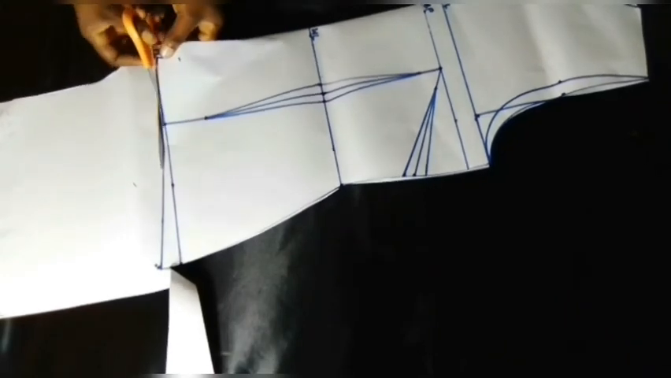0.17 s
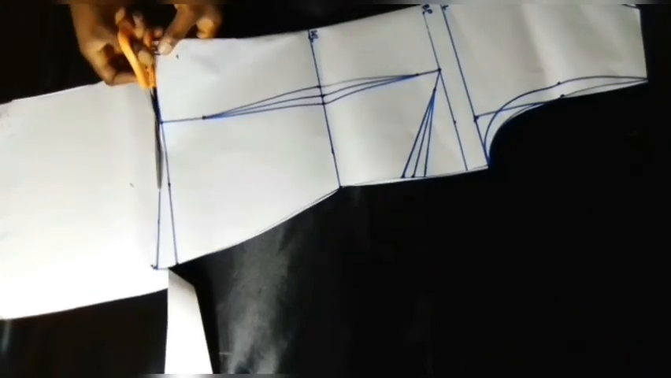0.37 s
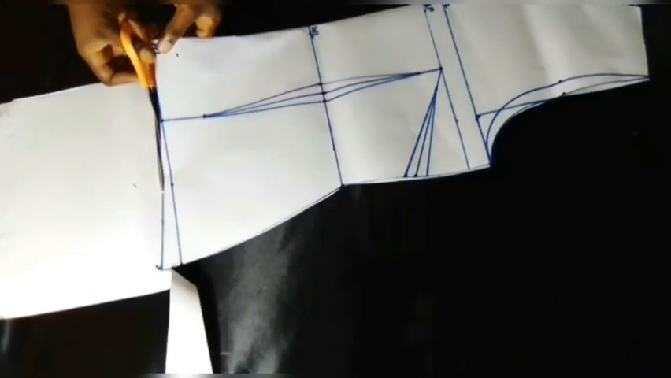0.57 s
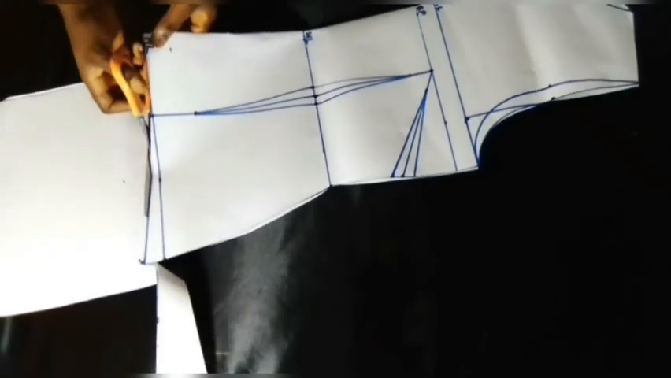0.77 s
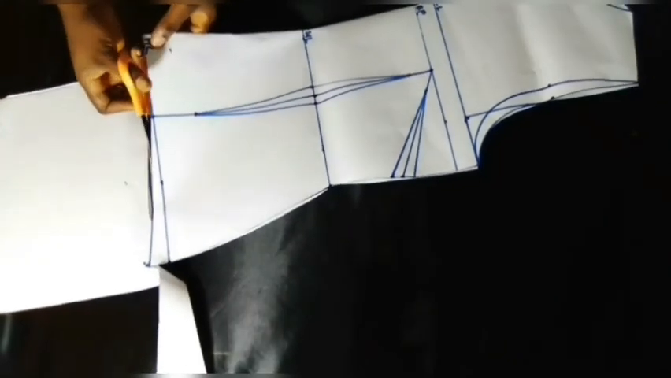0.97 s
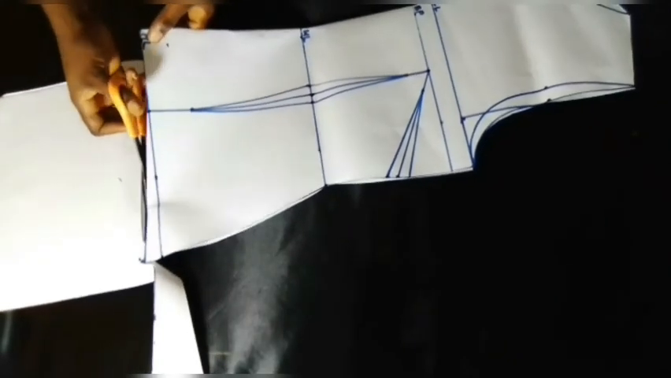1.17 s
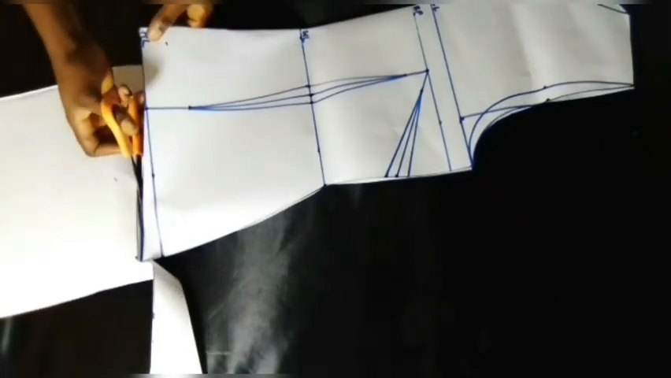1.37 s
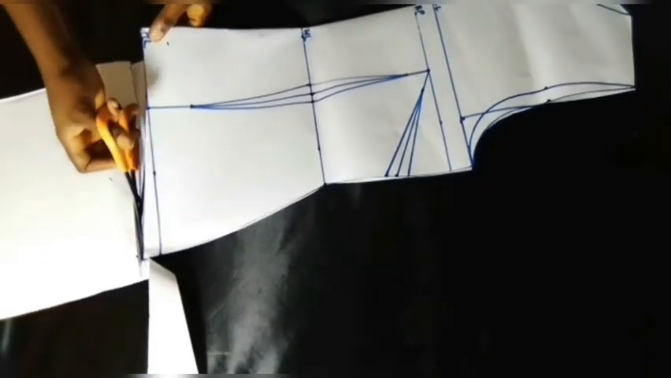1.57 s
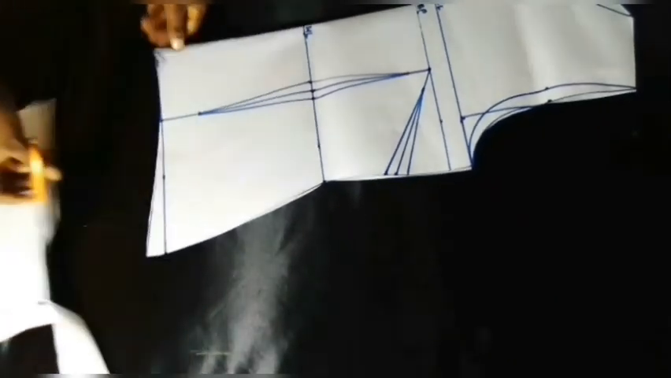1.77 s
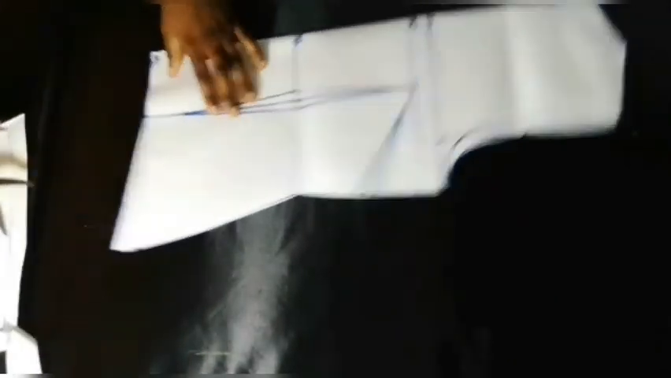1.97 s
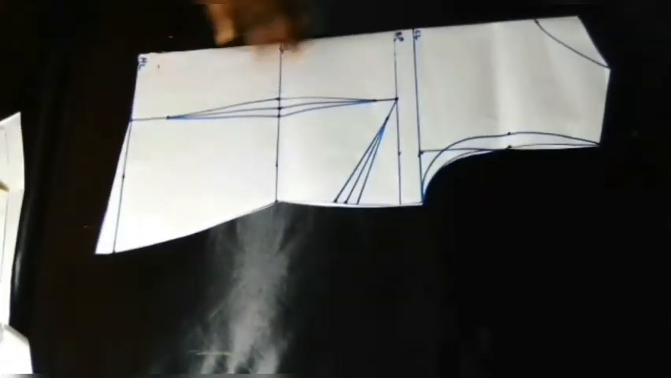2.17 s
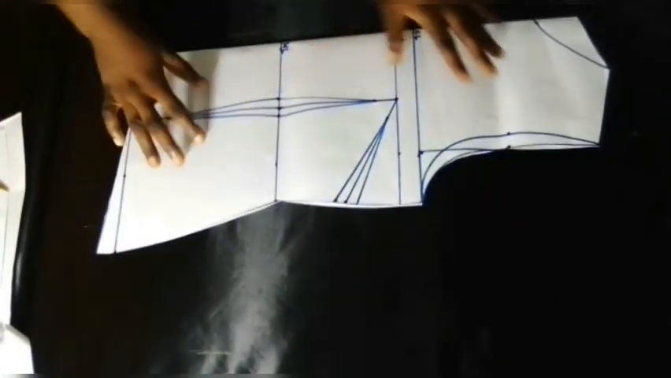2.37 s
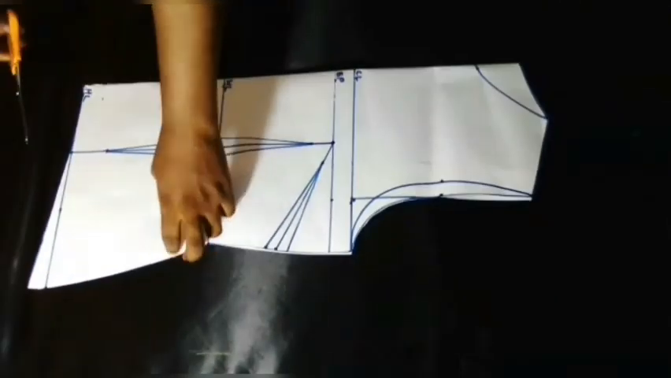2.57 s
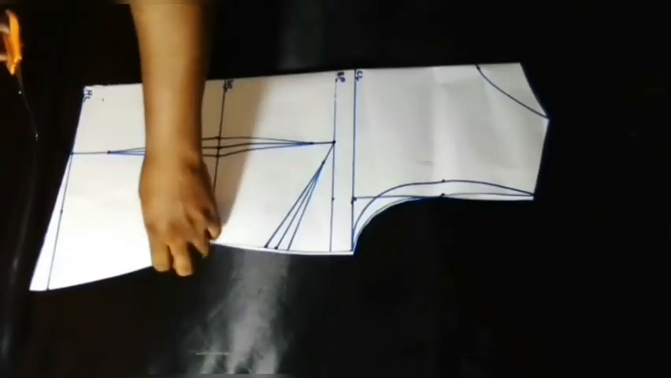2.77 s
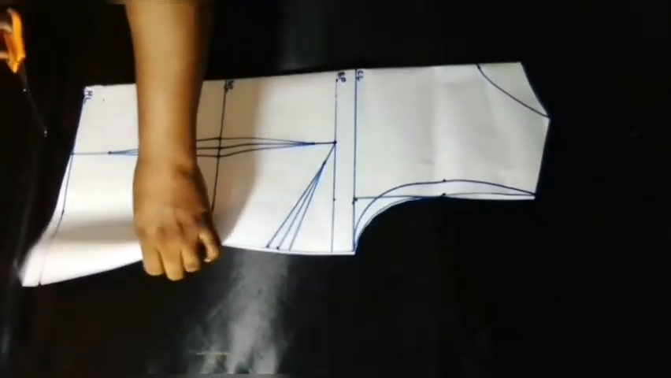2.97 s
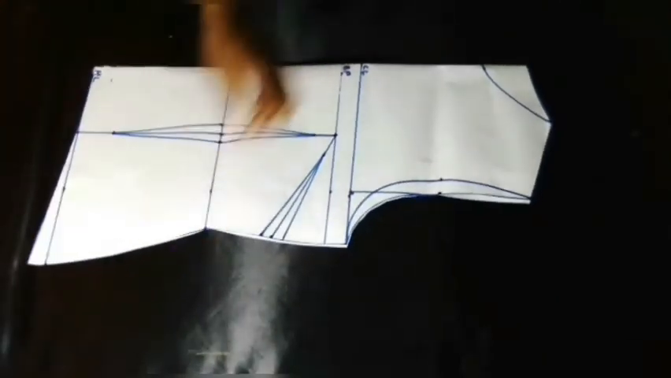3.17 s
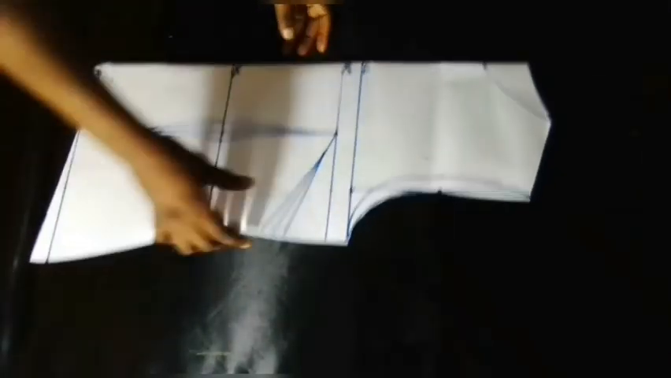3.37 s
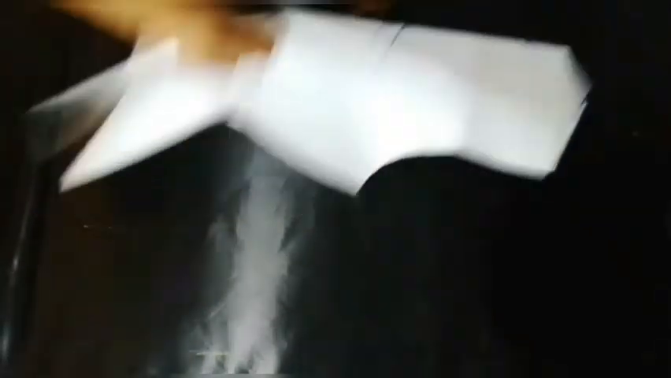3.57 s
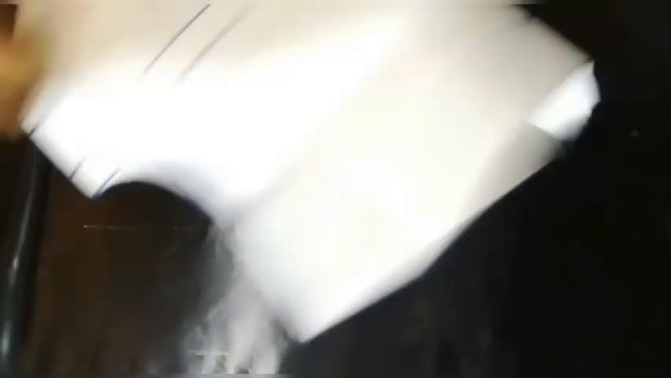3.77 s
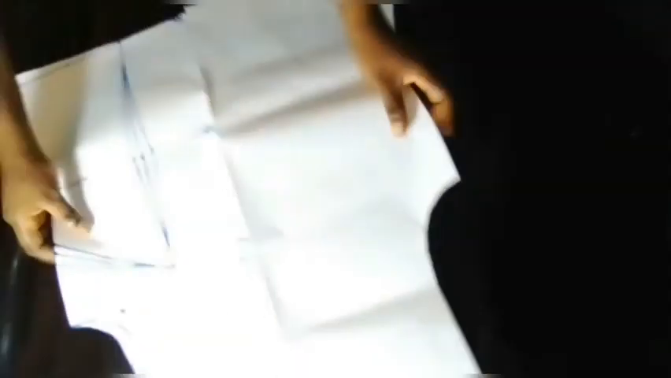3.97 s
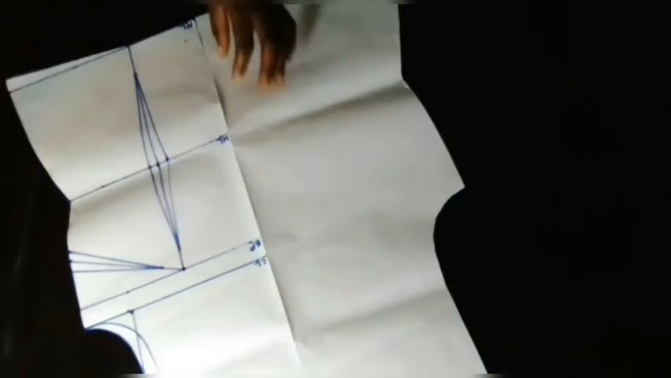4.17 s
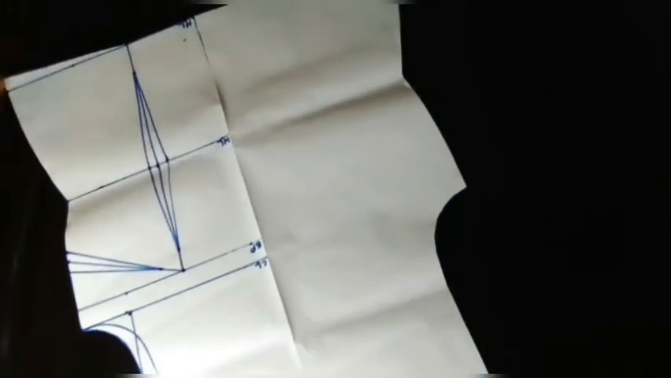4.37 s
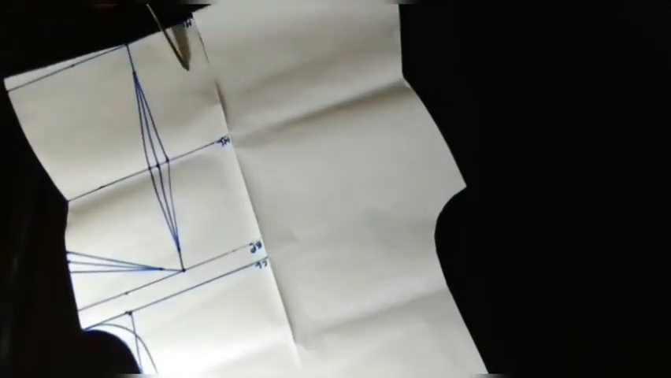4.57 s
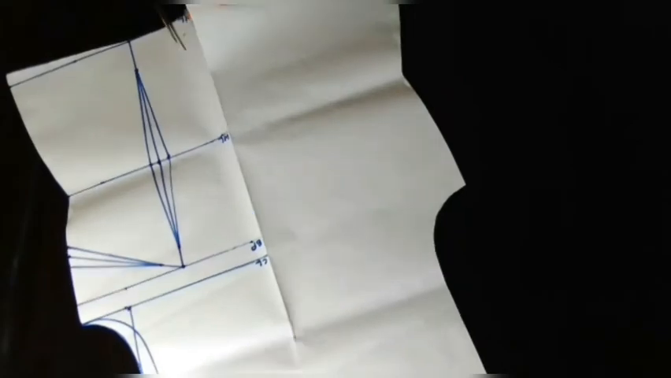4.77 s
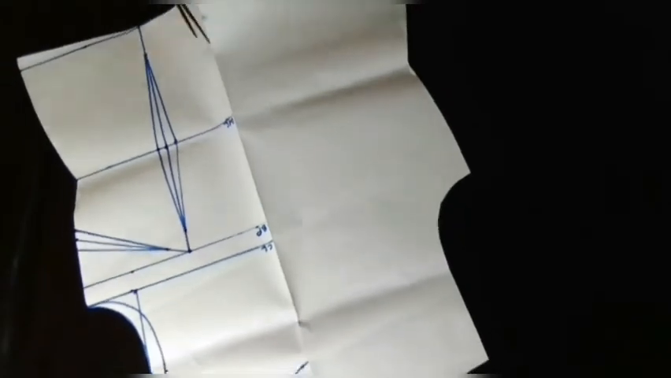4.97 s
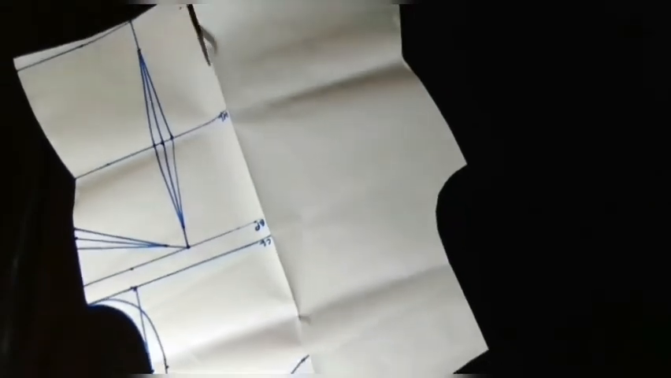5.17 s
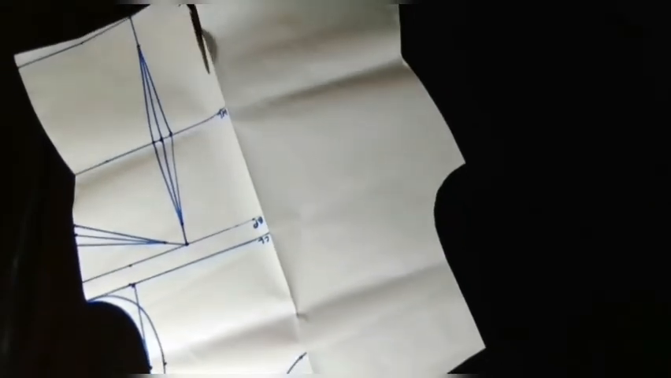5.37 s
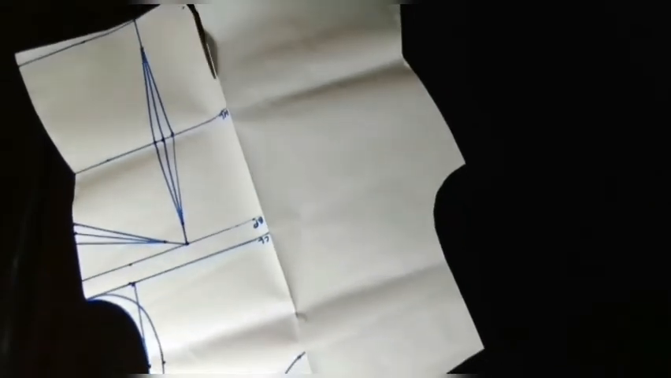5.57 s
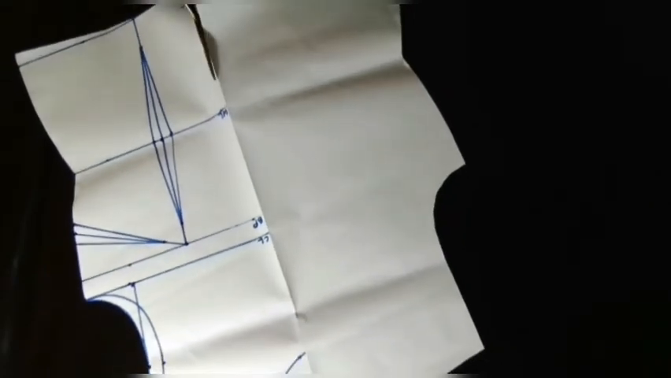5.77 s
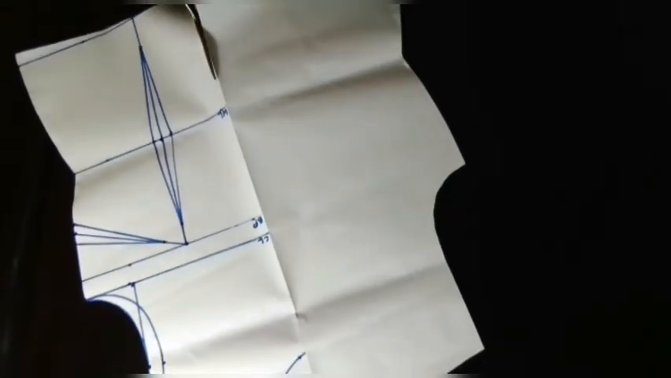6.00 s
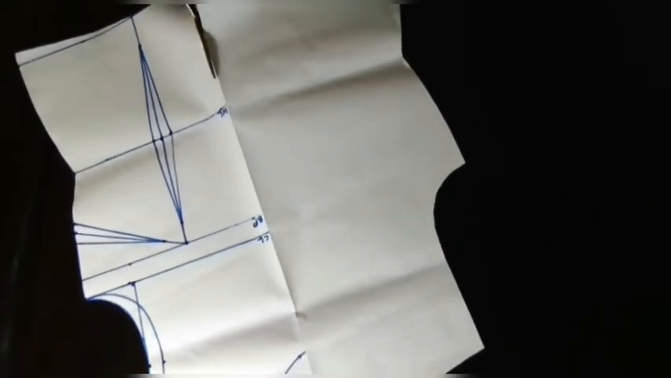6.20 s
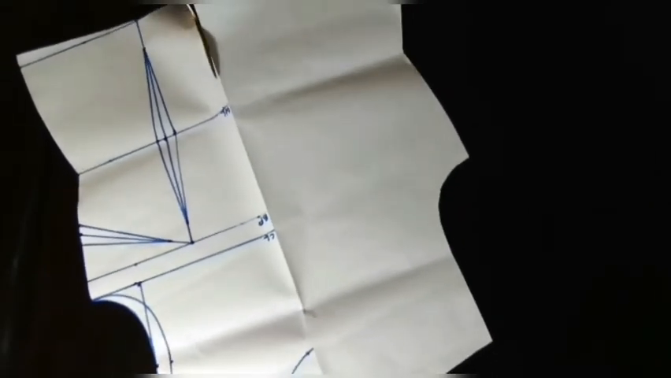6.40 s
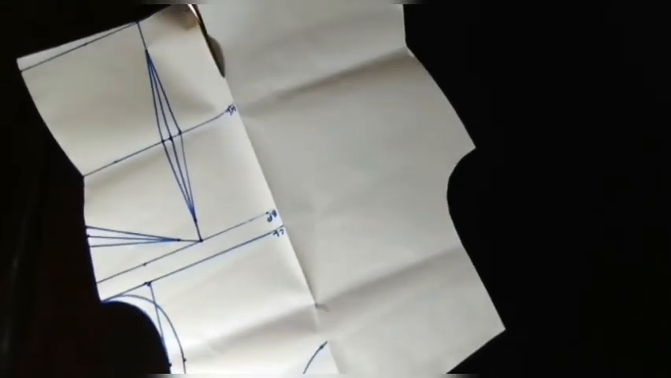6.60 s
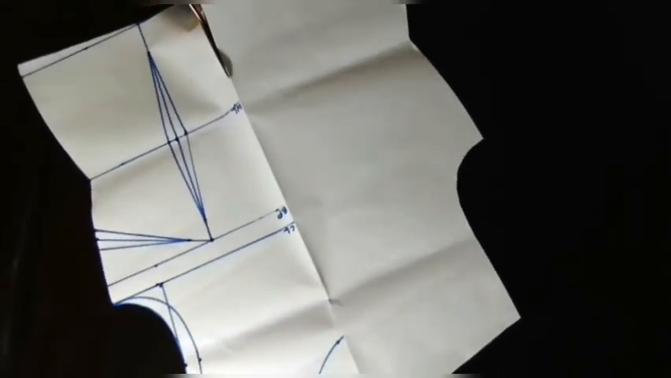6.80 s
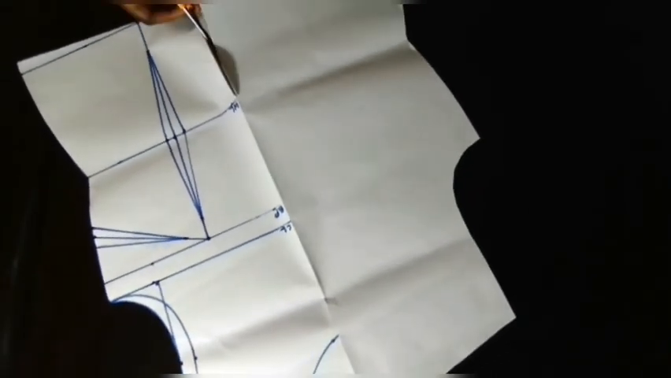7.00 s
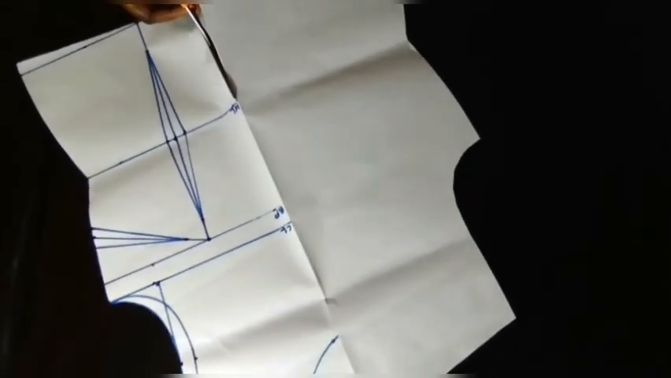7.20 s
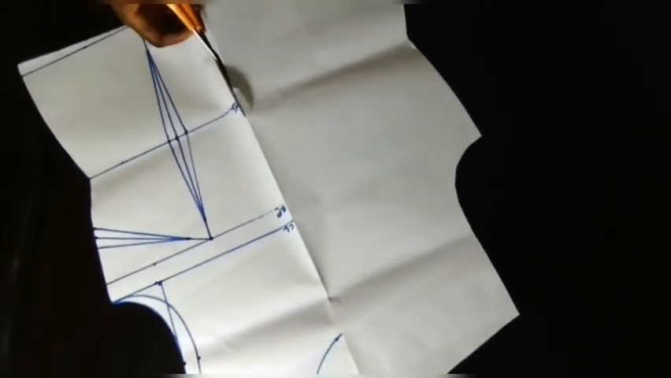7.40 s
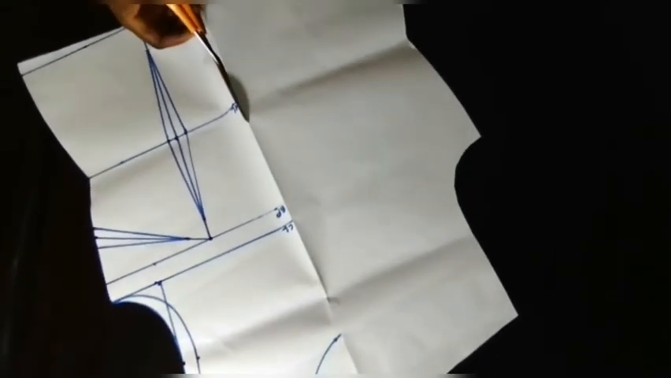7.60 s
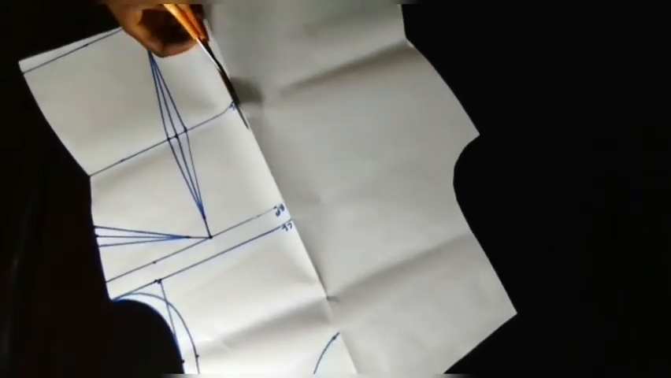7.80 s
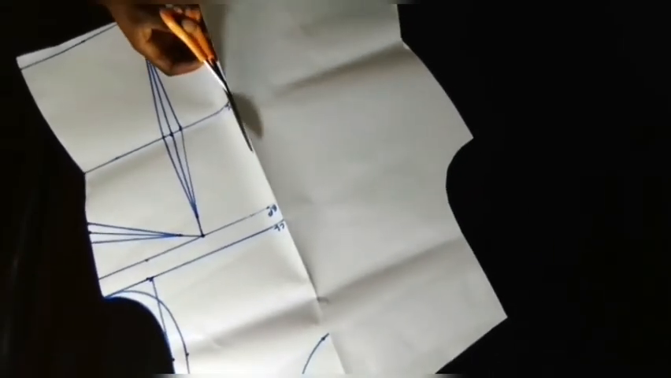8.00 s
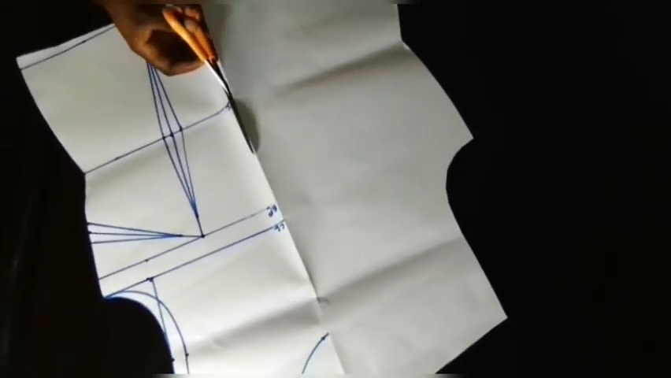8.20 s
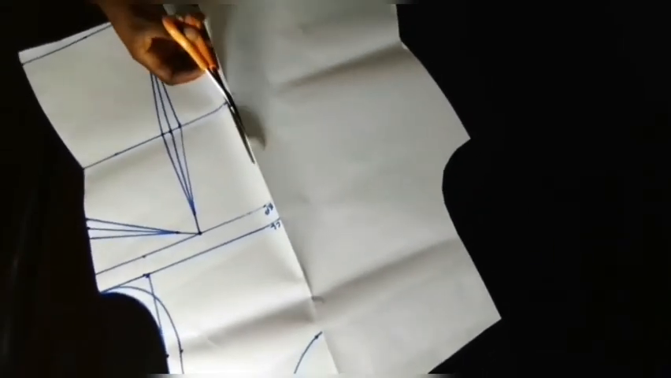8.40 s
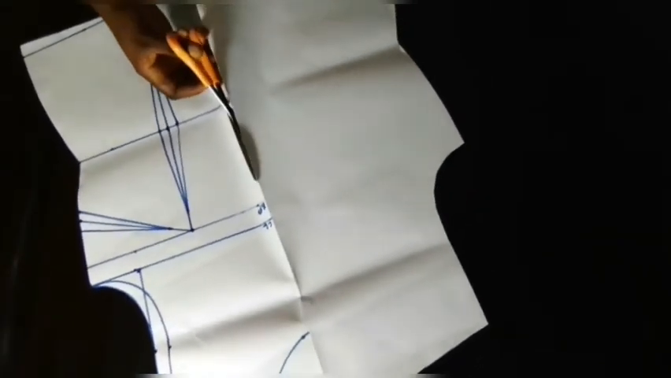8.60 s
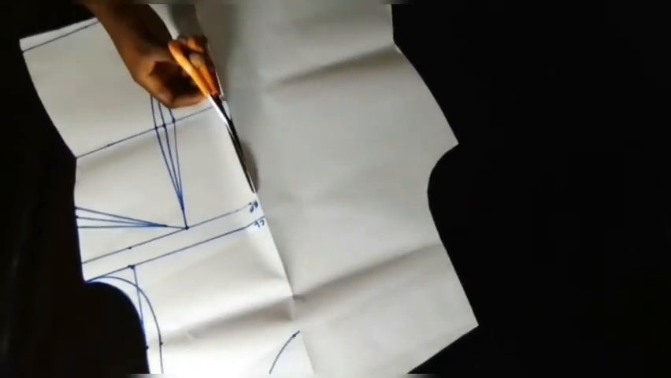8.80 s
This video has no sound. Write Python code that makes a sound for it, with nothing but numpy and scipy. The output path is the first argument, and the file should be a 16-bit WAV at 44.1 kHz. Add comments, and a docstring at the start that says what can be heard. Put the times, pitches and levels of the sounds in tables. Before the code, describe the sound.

Crisp paper snipping and rustling, soft hand thumps on a table, a loud crumpling flip, a sharp scissor clack, then slower crunchy cutting.

```python
"""Scissors cutting pattern paper

Scissors cut through paper on a table in a quiet room; the sheet is smoothed, slapped, flipped open and cut again.
Each bite of the blades is a rush of snapping fibres, coloured noise grains under a pressure envelope.
Between bites paper and steel slide as gentle friction, and hands and scissors bump and ring the table.
A small microphone with a ringing peak in the presence range hears it all over a faint hum."""
import sys
import numpy as np
from scipy import signal
from scipy.fft import rfft, irfft
from scipy.io import wavfile

SR = 44100
rng = np.random.default_rng(int(sys.argv[2]) if len(sys.argv) > 2 else 0)


def store_wav(level_fs):
    """Save 16-bit WAV to argv[1]."""
    pcm = np.round(np.clip(np.atleast_2d(level_fs), -1, 1) * 32767)
    wavfile.write(sys.argv[1], SR, pcm.T.astype(np.int16))


N = 390285
TIME = np.arange(N) / SR
FILTER_SIZE = 4096   # samples
GRID_HZ = np.maximum(np.fft.rfftfreq(FILTER_SIZE, 1 / SR), 1)


def from_db(db):
    """Decibels to gain."""
    return 10 ** (np.asarray(db) / 20)


def rms_one(x):
    """Scale to unit rms."""
    return x / np.sqrt(np.mean(x ** 2) + 1e-20)


def shape_db(points):
    """Join (frequency [Hz], level [dB]) points on a log-frequency axis."""
    hz, db = np.transpose(list(points))
    return np.interp(np.log(GRID_HZ), np.log(hz), db)


def response(db):
    """Causal, minimum-phase impulse response with this spectrum, by folding its cepstrum."""
    cepstrum = irfft(np.log(from_db(db)))
    cepstrum[1:FILTER_SIZE // 2] *= 2
    cepstrum[FILTER_SIZE // 2 + 1:] = 0
    return irfft(np.exp(rfft(cepstrum)))


def coloured(x, db):
    """Filter x by a spectrum."""
    return signal.fftconvolve(x, response(db))[:len(x)]


def add(track, s, sound):
    """Mix a sound into the track at time s."""
    start = int(round(s * SR))
    sound = sound[max(-start, 0):]   # drop what comes before the track begins
    start = max(start, 0)
    track[start:start + len(sound)] += sound[:max(N - start, 0)]


def stroke(hold_s, rise_s, fall_s):
    """Pressure builds, holds and lets go exponentially: times from the start of the hold, and the envelope."""
    t = np.arange(-SR // 12, SR // 4 + int(hold_s * SR)) / SR
    before = np.minimum(t, 0)
    after = np.maximum(t - hold_s, 0)
    return t, np.exp(before / max(rise_s, 1e-4) - after / max(fall_s, 1e-3))


def fibres(count, per_s, spread_db, hiss):
    """Fibres snap at random with uneven force over smooth friction; rms 1."""
    force = from_db(spread_db * np.minimum(rng.exponential(1, count), 3.5))
    force *= rng.choice([-1, 1], count)
    snapping = force * (rng.random(count) < per_s / SR)
    return rms_one(rms_one(snapping) + hiss * rng.standard_normal(count))


def unevenness(count, depth_db, per_s):
    """Contact catches and slips: a randomly wandering gain, rms 1."""
    steps = np.arange(count) * per_s / SR
    db = depth_db * np.clip(rng.standard_normal(int(steps[-1]) + 2), -2, 2)
    return rms_one(from_db(np.interp(steps, np.arange(len(db)), db)))


def sheet_modes(depth_db, spacing_hz):
    """A bent sheet has chance resonances, new for every bend."""
    knots = np.arange(0, SR / 2, spacing_hz)
    return np.interp(GRID_HZ, knots, depth_db * rng.standard_normal(len(knots)))


# spectrum of tearing and snapping paper: (frequency [Hz], level [dB])
PAPER = [(100.0, -31.5), (300.0, -11), (600.0, -15), (900.0, -11.5), (1300.0, -6), (1700.0, -4),
         (2100.0, 0.5), (2700.0, -0.0), (3400.0, 0), (4100.0, -5.5), (4800.0, -13.5), (6500.0, -24),
         (9000.0, -33), (13000.0, -44)]
# tone regions of the sheet that vary by stroke, body, middle, steady anchor, sheen: (frequency [Hz])
PAPER_ZONES_HZ = [950, 2230, 3200, 7100]


def add_crunch(track, s, hold_s, rise_s, fall_s, level_db, zones_db):
    """A run of fibres gives way, and the sheet radiates it with its momentary colour."""
    t, pressure = stroke(hold_s, rise_s, fall_s)
    tone = shape_db(PAPER) + shape_db(zip(PAPER_ZONES_HZ, zones_db))
    bend = sheet_modes(depth_db=2.4, spacing_hz=170)
    catching = unevenness(len(t), depth_db=2.2, per_s=250)
    tear = pressure * catching * fibres(len(t), per_s=2200, spread_db=2.6, hiss=0.3)
    tear *= np.sqrt(np.sum(pressure ** 2) / np.sum(tear ** 2))   # the stroke sets the energy
    add(track, s + t[0], from_db(level_db - 1.5) * coloured(tear, tone + bend))


# the blades bite through the paper: (time [s], hold [s], rise [s], level [dB], body [dB])
BITES = [(0.177, .002, 0.0065, -32, 3.5), (0.254, 0.0056, 0.0093, -35.5, -3), (0.38, 0.011, .006, -39, 9),
         (0.502, .006, .004, -36.5, 1), (0.608, .02, 0.012, -40, 5), (0.649, 0.023, 0.01, -39, 4),
         (0.902, 0.027, .02, -41.5, -8), (0.983, .014, 0.0061, -36.5, -0.5),
         (1.149, .046, .004, -36.3, 1.5), (1.245, 0.012, 0.0042, -34, -7),
         (1.275, 0.033, 0.017, -39.5, 0.5), (1.359, .006, .002, -37.5, 1), (1.384, 0.015, 0.012, -33.5, -5),
         (1.452, 0.0097, .002, -40, -12), (1.553, 0.024, .004, -35.5, -9), (1.701, 0.028, .03, -43.5, -2),
         (1.753, .015, .004, -39, 4.5), (4.983, .005, .009, -44, 2), (5.356, .004, .001, -47, 4),
         (5.448, .015, 0.0011, -44.5, 5), (5.612, .002, 0.0022, -46, 7), (6.7, 0.0061, 0.0063, -44, 7),
         (6.769, .002, .005, -35.5, 3), (6.815, .004, .001, -34.5, -1), (7.208, 0.0045, 0.0022, -29.5, 6),
         (7.260, .005, .002, -32, -4), (7.325, .023, 0.019, -37, -3), (7.676, 0.034, 0.0093, -31, 2),
         (7.744, 0.0046, .004, -36, -10), (7.769, .028, .005, -33, -7.5), (7.806, .072, .006, -35.5, -4),
         (8.048, .002, .003, -44, -6), (8.075, .002, .001, -41, -8), (8.123, 0.0018, .008, -35.5, -14),
         (8.282, .034, .003, -37, -3), (8.657, 0.013, .004, -36, -2), (8.691, .022, 0.0045, -36, 4),
         (8.748, 0.033, .001, -34.5, -10), (8.795, 0.0094, 0.0045, -33, -5), (8.821, 0.027, .01, -39, -3)]
# tone of the sheet, bright in the first cut and duller in the second: (time [s], middle [dB], sheen [dB])
CUT_TONE = [(0.2, 1, 3.5), (0.5, -4, -1.5), (1.0, -0.5, 4), (1.55, -4, 3.5), (1.75, -11, 10.5),
            (3.0, -6, 7), (5.3, 3, -3), (6.83, 2, 0), (7.2, 2.5, -7), (7.8, -0.5, -6), (8.3, 0, -4),
            (8.8, -1, 0)]
BITE_FALL_S = .0105   # the sheet falls quiet after a bite


def bites():
    """Each bite tears fibres with the tone that the sheet has at that point of the cut."""
    out = np.zeros(N)
    times, middles_db, sheens_db = np.transpose(CUT_TONE)
    for s, hold_s, rise_s, level_db, body_db in BITES:
        middle_db = np.interp(s, times, middles_db)
        sheen_db = np.interp(s, times, sheens_db)
        add_crunch(out, s, hold_s, rise_s, BITE_FALL_S, level_db, [body_db, middle_db, 0, sheen_db])
    return out


# one loud clack of the scissors on the sheet: (time [s], hold [s], rise [s], fall [s], level [dB])
CLACK = (6.2352, .007, .0012, .007, -26.5)
CLACK_SHEEN_DB = -1.5


def clack():
    """The scissors strike the sheet: a loud crunch that falls faster than a bite."""
    out = np.zeros(N)
    add_crunch(out, *CLACK, [0, 0, 0, CLACK_SHEEN_DB])
    return out


# the sheet buckles as it is lifted and flipped open: (time [s], hold [s], rise [s], level [dB], body [dB])
CRUMPLES = [(2.398, 0.013, 0.0088, -37.5, 1), (3.440, .002, 0.0074, -32.5, 4),
            (3.4955, .012, .0015, -30, -3), (3.626, 0.014, 0.0027, -30.5, 10.5),
            (3.668, 0.052, 0.017, -33.5, 11), (3.739, .009, .008, -27, 10),
            (3.763, .016, 0.0089, -36, 10.5), (3.797, 0.0075, 0.0009, -28.5, 9),
            (3.864, 0.015, .012, -28, 11)]
CRUMPLE_FALL_S = .010   # the sheet falls quiet after a buckle
CRUMPLE_MIDDLE_DB, CRUMPLE_SHEEN_DB = -1, 3.5
SHEEN_PER_BODY = 0.77   # a wide buckle has more body and less sheen (dB per dB)


def crumples():
    """The free sheet buckles: the wider the buckle, the fuller and duller it sounds."""
    out = np.zeros(N)
    for s, hold_s, rise_s, level_db, body_db in CRUMPLES:
        sheen_db = CRUMPLE_SHEEN_DB - SHEEN_PER_BODY * body_db
        zones_db = [body_db, CRUMPLE_MIDDLE_DB, 0, sheen_db]
        add_crunch(out, s, hold_s, rise_s, CRUMPLE_FALL_S, level_db, zones_db)
    return out


# single sharp snaps of paper or blade: (time [s], level [dB])
SNAPS = [(0.1575, -39), (0.3222, -40), (0.3786, -32), (0.425, -39), (0.7572, -40), (1.2461, -33),
         (1.3549, -31), (3.4376, -32), (3.5025, -26), (3.5349, -30), (3.7978, -30), (3.8636, -31),
         (4.7292, -36), (4.7432, -37), (4.779, -31.5), (5.45, -38), (6.2348, -22.5), (6.2402, -29),
         (6.768, -36), (6.8139, -31), (6.9401, -36.5), (7.205, -35), (7.2596, -36), (7.718, -32),
         (8.0746, -36), (8.2294, -35.5), (8.7535, -30)]
SNAP_RING_HZ = 3480


def snaps():
    """A crease pops or the blades catch: a click and a few ms of rattle, brighter when it is harder."""
    out = np.zeros(N)
    t = np.arange(FILTER_SIZE) / SR
    ring = shape_db([(SNAP_RING_HZ / 2, -4), (SNAP_RING_HZ, 0), (SNAP_RING_HZ * 2, -2)])
    for s, level_db in SNAPS:
        sheen = shape_db([(3700, 0), (4500, 1.4), (10000, 1 + .5 * (level_db + 30))])
        rattle = .07 * rng.standard_normal(len(t)) * np.exp(-t / .003)
        click = (t == 0) + rattle
        snap = coloured(click, shape_db(PAPER) + sheen + ring)
        add(out, s + 0.00063, from_db(level_db - 3.5) * snap / np.abs(snap).max())
    return out


# strokes of paper sliding along the blades or over the table: (time [s], length [s], level [dB])
SLIDES = [(0.0, 0.12, -52), (0.157, 0.2, -47.5), (0.435, .1, -48), (0.574, 0.1, -46.5),
          (0.762, 0.056, -49.5), (0.869, 0.19, -48.5), (1.135, .17, -48), (1.393, 0.037, -46),
          (1.469, .17, -48.5), (1.66, 0.19, -48.5), (1.876, 0.15, -45.5), (2.396, .055, -51),
          (2.537, 0.29, -67.5), (2.886, 0.056, -49.5), (2.989, 0.044, -50), (3.418, 0.49, -44.5),
          (3.949, 0.092, -46.5), (4.53, .17, -55.5), (4.76, .12, -51.5), (4.963, 0.066, -58.5),
          (5.129, 0.047, -57.5), (5.321, 0.11, -55.5), (5.471, 0.072, -47), (5.649, .015, -47),
          (5.86, .015, -61), (5.96, .006, -54), (6.088, 0.032, -59.5), (6.245, .03, -47.5),
          (6.483, 0.066, -64), (6.583, 0.14, -52.5), (6.78, .16, -50.5), (7.034, 0.033, -54.5),
          (7.096, .08, -49), (7.186, .18, -42.5), (7.392, 0.052, -54.5), (7.564, 0.024, -57),
          (7.614, 0.17, -50.5), (7.77, .14, -42.5), (7.952, 0.0087, -44.5), (8.10, .1, -52.5),
          (8.24, .05, -47), (8.34, .15, -44.3), (8.587, 0.3, -46)]
# spectrum of rubbing paper: (frequency [Hz], level [dB])
RUB = [(200.0, -22), (600.0, -10), (1000.0, -11), (1500.0, -4), (2100.0, -3), (2800.0, 0), (3500.0, 1),
       (4100.0, -6), (4800.0, -12.5), (6500.0, -19.5), (9000.0, -26.5), (13000.0, -37.5)]
SLIDE_RISE_S, SLIDE_FALL_S = .009, .016   # swell and fade of a stroke
RESTING_DB = -67   # the held sheet is never quite still
SLIDE_SHEEN_SHARE = 0.58   # sliding follows the sheen of the sheet (dB per dB)


def sliding():
    """Each stroke swells, holds and fades; fine friction grains and a few coarser crackles follow it."""
    rubbing = np.full(N, from_db(RESTING_DB))
    for s, length_s, level_db in SLIDES:
        t, pressure = stroke(length_s, SLIDE_RISE_S, SLIDE_FALL_S)
        add(rubbing, s + t[0], from_db(level_db) * pressure)
    level = rubbing * unevenness(N, depth_db=1.8, per_s=80)
    fine_grains = fibres(N, per_s=3500, spread_db=4.0, hiss=0.61)
    coarse_grains = fibres(N, per_s=220, spread_db=2.0, hiss=0)
    friction = from_db(-3.3) * coloured(level * fine_grains, shape_db(RUB))
    crackle = from_db(-11.0) * coloured(level * coarse_grains, shape_db(PAPER))
    rustle = friction + crackle
    high_pass = signal.butter(3, 4400, "high", fs=SR, output="sos")
    treble = signal.sosfiltfilt(high_pass, rustle)
    times, _, sheen_db = np.transpose(CUT_TONE)
    treble_gain = from_db(SLIDE_SHEEN_SHARE * np.interp(TIME, times, sheen_db))
    return rustle + (treble_gain - 1) * treble


# hands and scissors landing on the table, the last three shaping the tone relative to the level:
# (time [s], hold [s], level [dB], boom [dB], knock [dB], paper slap [dB])
THUMPS = [(0.0225, .001, -15.5, -6, -3, -24), (1.38, .008, -27.5, -11, -15, 1),
          (1.866, 0.018, -23, 4, -1.5, 0), (1.917, .01, -31, 0, -24, 1), (2.076, .01, -19.5, -3, -2, -12.5),
          (2.754, 0.05, -32, 4, -14.5, -4.5), (2.858, .045, -23, 7.5, -11.5, -12),
          (3.217, .035, -7.5, 7, 0, -4), (3.977, 0.0088, -38.5, 5.5, 3, -3),
          (4.144, .016, -24.5, 3, 0.5, -12.5), (4.261, 0.0142, -20, 0.5, 0.5, -7),
          (4.536, .016, -13.5, -7.5, -13, -21), (6.278, .065, -33.5, 4, -1, -7.5)]
# spectrum of a soft landing: (frequency [Hz], level [dB])
THUD = [(40, -53), (95, -26.5), (135, -7.5), (175, -10), (250, -3.5), (400, -5), (650, -11), (950, -11.5),
        (1400, -15), (2200, -18), (3500, -23), (4500, -28), (7000, -47), (12000, -72)]
# tone regions that vary by landing, boom, steady anchor, hollow, knock, slap: (frequency [Hz])
THUD_ZONES_HZ = [135, 340, 650, 1250, 3200]
# ringing modes of the table top: (frequency [Hz], relative level [dB], 60 dB decay time [s])
TABLE = [(135.2, 4.5, 0.11), (211.1, -7.5, 0.22), (251, -6, 0.1), (404.5, -14.5, 0.17), (530, -11.5, 0.093),
         (624, -13.5, 0.19), (780, -21, 0.13), (915, -28, 0.2), (970, -19, 0.1)]
THUMP_RISE_S, THUMP_FALL_S = 0.0044, 0.015
FALL_PER_HOLD = .2   # a longer landing also settles longer (s per s)
HOLLOW_PER_KNOCK = 0.44   # the hollow of the table follows the knock (dB per dB)
TABLE_DB, TABLE_SWELL_S = -22, .006   # ring of the table top under a landing
THUMP_LOW_CUT_HZ = 98   # the landings carry no deep bass below this


def table_ring():
    """The table top rings in decaying modes of alternating sign, taking a moment to follow a soft blow."""
    t = np.arange(SR // 2) / SR
    ringing = np.zeros(len(t))
    for k, (hz, db, t60) in enumerate(TABLE):
        ringing += (-1) ** k * from_db(db - 60 * t / t60) * np.sin(2 * np.pi * hz * t)
    swell = (1 - np.exp(-t / TABLE_SWELL_S)) ** 2
    return from_db(TABLE_DB) * ringing * swell


def thumps():
    """A soft landing is a cluster of contacts, duller as it settles; its weight also sets the table top ringing."""
    out, push = np.zeros(N), np.zeros(N)
    for s, hold_s, level_db, boom_db, knock_db, slap_db in THUMPS:
        rise_s = min(THUMP_RISE_S, hold_s)   # a brief touch starts abruptly
        t, pressure = stroke(hold_s, rise_s, THUMP_FALL_S + FALL_PER_HOLD * hold_s)
        zones_db = [boom_db / 2, 0, HOLLOW_PER_KNOCK * knock_db, knock_db, slap_db]
        tone = shape_db(THUD) + shape_db(zip(THUD_ZONES_HZ, zones_db))
        contacts = pressure * fibres(len(t), per_s=3000, spread_db=1.64, hiss=0.41)
        fresh = np.exp(-np.maximum(t, 0) / 0.023)   # crossfades from bright to dull
        landing = coloured(fresh * contacts, tone + shape_db([(1500, 0.5), (6000, 5.9)]))
        settling = coloured((1 - fresh) * contacts, tone + shape_db([(3000, -2), (7000, -7.5)]))
        add(out, s + t[0], from_db(level_db) * (landing + settling))
        add(push, s + hold_s / 2, from_db([level_db + boom_db]))   # one-sample push
    out += signal.fftconvolve(push, table_ring())[:N]
    low_cut = signal.butter(3, THUMP_LOW_CUT_HZ, "high", fs=SR, output="sos")
    return signal.sosfilt(low_cut, out)


# hard knocks of the scissors on the table:
# (time [s], level [dB], low mode [Hz], high mode [Hz], 60 dB decay time [s])
KNOCKS = [(0.0228, -32, 275, 713, 0.04), (4.546, -28, 396, 655, 0.075)]


def knocks():
    """A hard touch rings two short, woody modes that depend on where it lands."""
    out, t = np.zeros(N), np.arange(SR // 4) / SR
    for s, level_db, low_hz, high_hz, t60 in KNOCKS:
        # opposed, so the wood starts from rest
        modes = np.cos(2 * np.pi * low_hz * t) - np.cos(2 * np.pi * high_hz * t)
        add(out, s, from_db(level_db - 7 - 60 * t / t60) * modes)
    return out


def room(x, early_db, early_t60, late_db, late_t60):
    """Quick reflections from the table and near walls, then a faint tail, both as decaying noise."""
    t = np.arange(SR // 2) / SR
    arrived = t > .002
    early = rms_one(arrived * rng.standard_normal(len(t)) * from_db(-60 * t / early_t60))
    late = rms_one(arrived * rng.standard_normal(len(t)) * from_db(-60 * t / late_t60))
    echoes = (from_db(early_db) * early + from_db(late_db) * late) / np.sqrt(len(t))
    return x + signal.fftconvolve(x, echoes)[:N]


# spectrum of the room air: (frequency [Hz], level [dB])
ROOM_NOISE = [(25, -68), (50, -65.5), (100, -57), (125, -51), (250, -50.5), (400, -51.5), (700, -55),
              (1200, -58.5), (2500, -63.5), (3600, -66.5), (5000, -76), (13000, -78.5)]
# a far fan humming in the room: (frequency [Hz], wander [Hz], rms level [dB])
HUM = [(156.2, 5.1, -74), (297.6, 5.98, -69), (473.6, 4.97, -75.5), (506, 6.17, -77), (646, 10.3, -84.5)]


def background():
    """Room air as shaped noise, and a hum of sines that wander slightly in pitch."""
    out = coloured(rng.standard_normal(N), shape_db(ROOM_NOISE))
    knots = np.arange(0, N / SR + 1, .04)
    for hz, wander_hz, db in HUM:
        pitch = hz + wander_hz * np.interp(TIME, knots, rng.standard_normal(len(knots)))
        out += np.sqrt(2) * from_db(db) * np.sin(2 * np.pi * np.cumsum(pitch) / SR)
    return out


def scene():
    """Everything reaches both channels alike."""
    work = bites() + clack() + crumples() + snaps() + sliding() + thumps() + knocks()
    mono = room(work, early_db=-9.5, early_t60=0.038, late_db=-23.5, late_t60=.33) + background()
    return np.array([mono, mono])


def resonance(x, hz, width_hz):
    """Two-pole band-pass, gain 1 on top."""
    r = np.exp(-np.pi * width_hz / SR)
    zeros = np.array([1, 0, -1]) * (1 - r * r) / 2
    poles = [1, -2 * r * np.cos(2 * np.pi * hz / SR), r * r]
    return signal.lfilter(zeros, poles, x + 1e-18)


MIC_PEAK_HZ, MIC_WIDTH_HZ, MIC_BOOST = 3525, 506, 1.94   # boost is a gain
CUTOFF_HZ = 14000


def record(dry):
    """The microphone rings and hisses, the level dips briefly once, the top is cut."""
    heard = dry + MIC_BOOST * resonance(dry, MIC_PEAK_HZ, MIC_WIDTH_HZ)
    hiss = from_db(-76.5) * rng.standard_normal(N)   # shared by both channels
    treble = signal.butter(4, 6000, "high", fs=SR, output="sos")
    channel_hiss = from_db(-87) * signal.sosfilt(treble, rng.standard_normal((2, N)))
    dip_db = np.interp(TIME, [2.463, 2.468, 2.484, 2.492, 2.51], [0, -23, -23, -7, 0])
    low_pass = signal.ellip(12, .1, 70, CUTOFF_HZ, fs=SR, output="sos")
    return signal.sosfilt(low_pass, (heard + hiss + channel_hiss) * from_db(dip_db))


dry = scene()
out = record(dry)
store_wav(out)
```